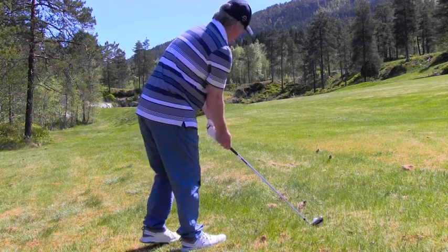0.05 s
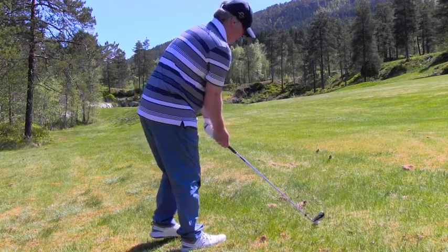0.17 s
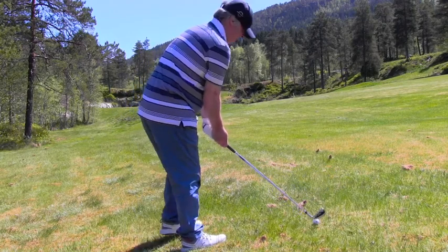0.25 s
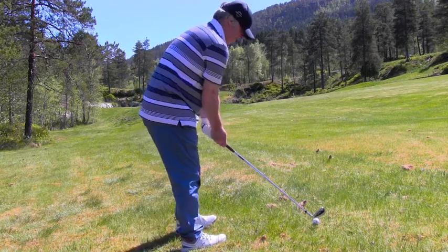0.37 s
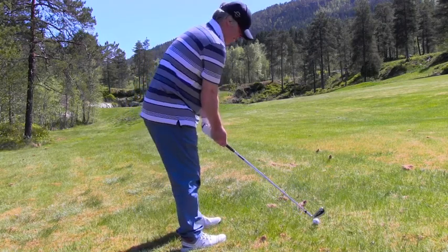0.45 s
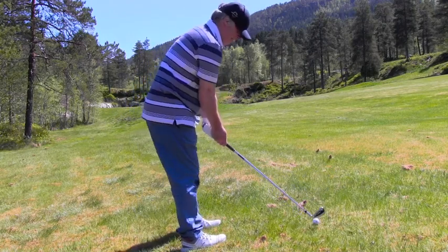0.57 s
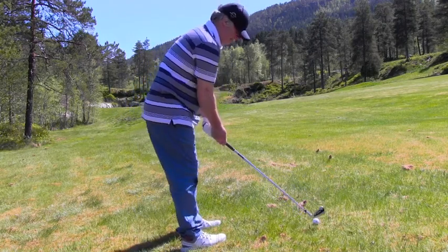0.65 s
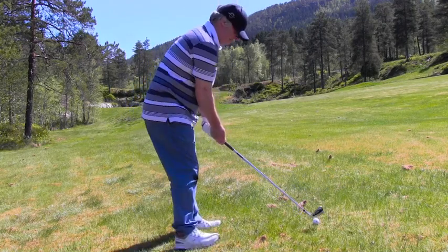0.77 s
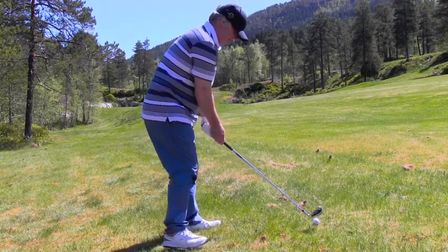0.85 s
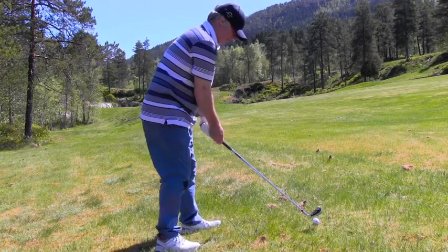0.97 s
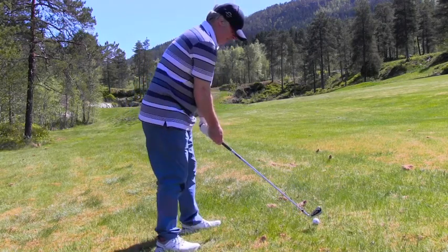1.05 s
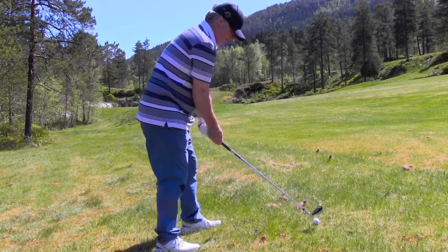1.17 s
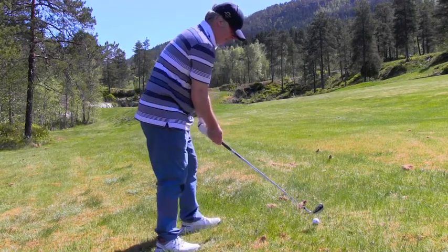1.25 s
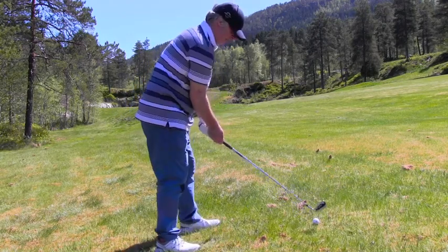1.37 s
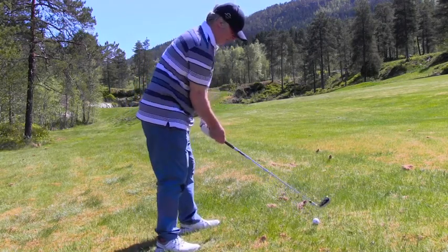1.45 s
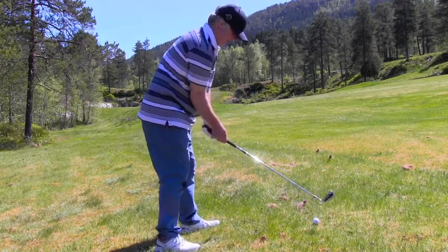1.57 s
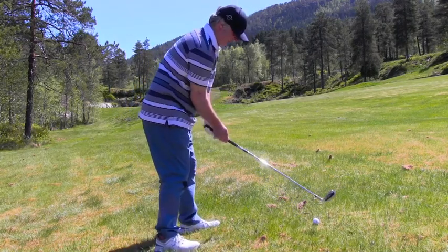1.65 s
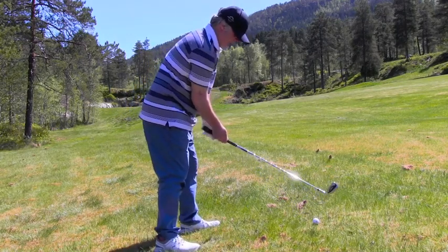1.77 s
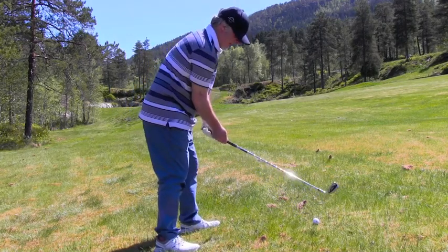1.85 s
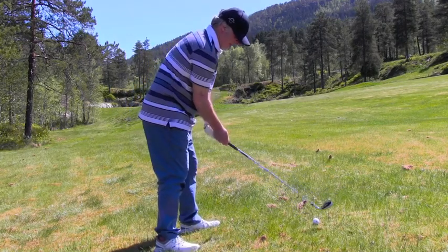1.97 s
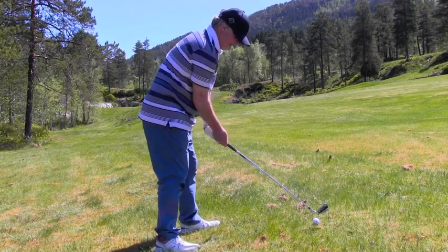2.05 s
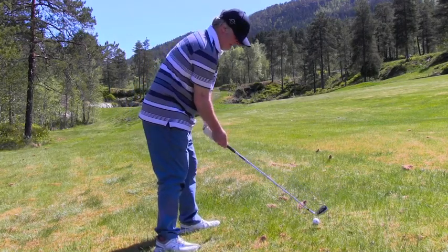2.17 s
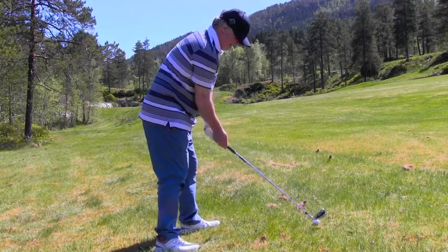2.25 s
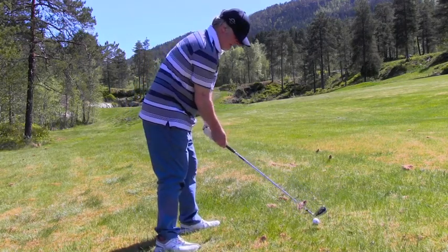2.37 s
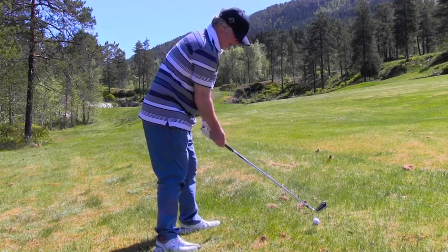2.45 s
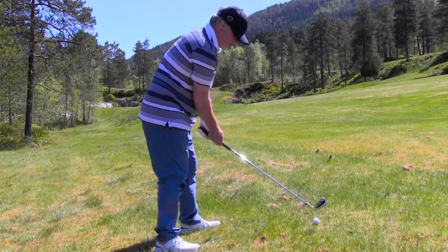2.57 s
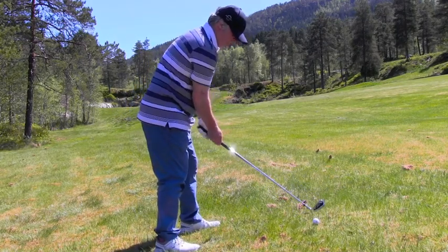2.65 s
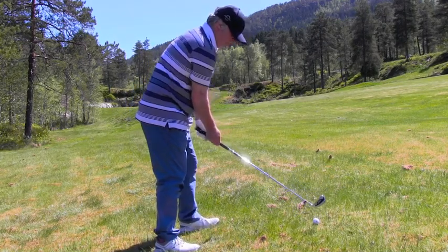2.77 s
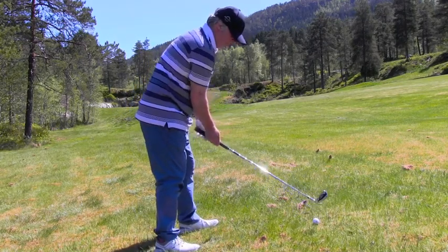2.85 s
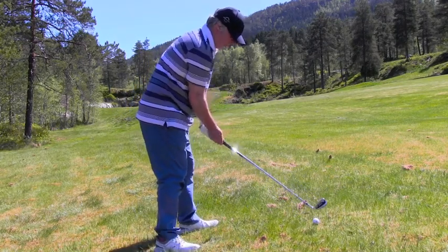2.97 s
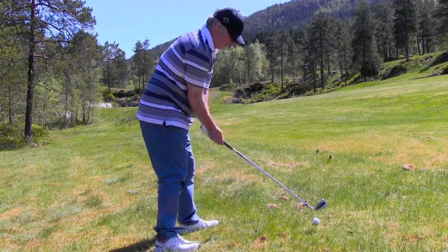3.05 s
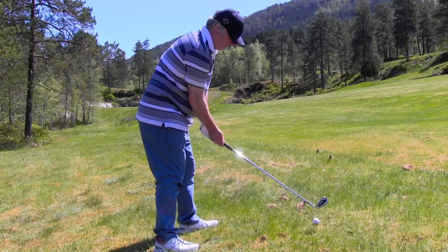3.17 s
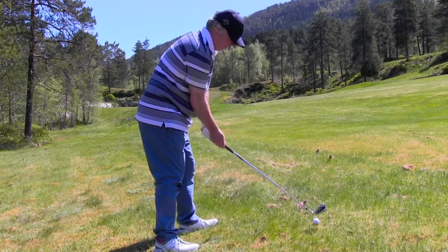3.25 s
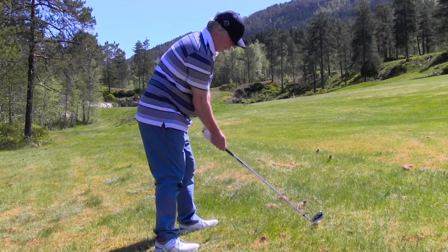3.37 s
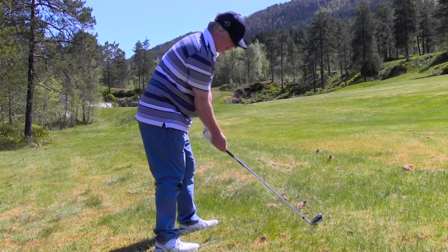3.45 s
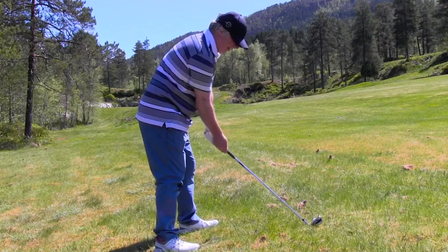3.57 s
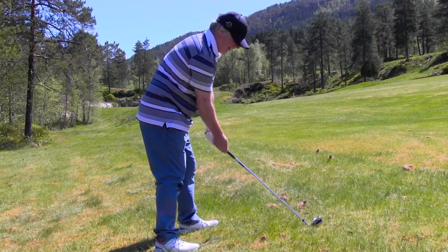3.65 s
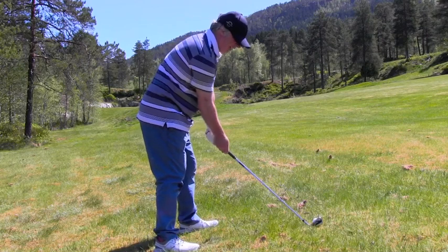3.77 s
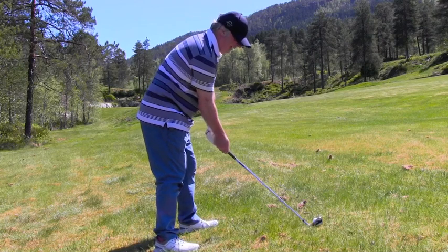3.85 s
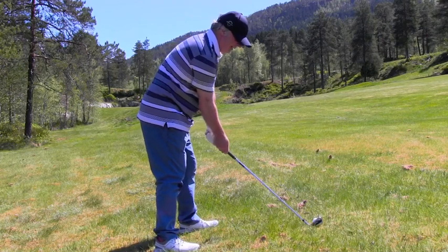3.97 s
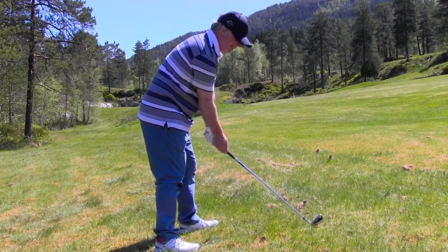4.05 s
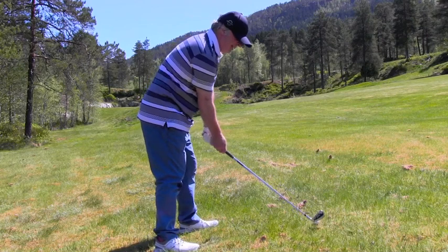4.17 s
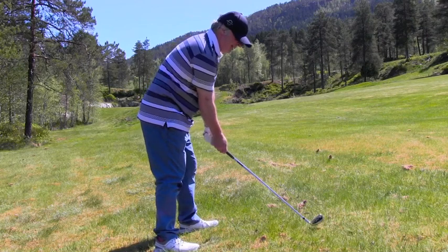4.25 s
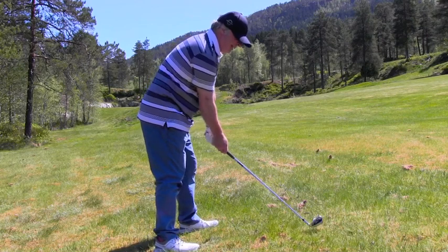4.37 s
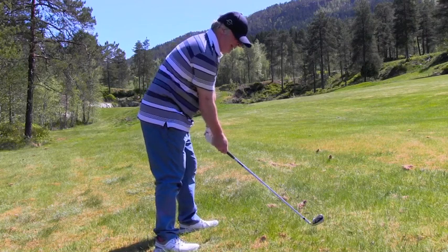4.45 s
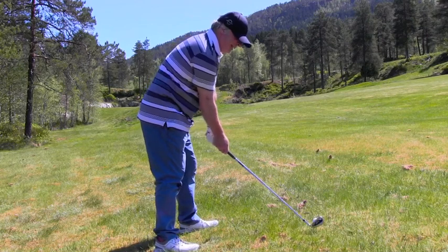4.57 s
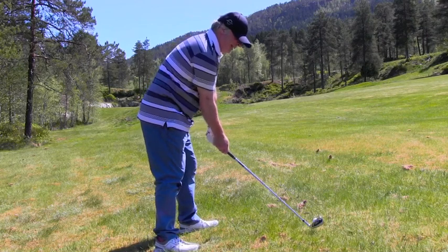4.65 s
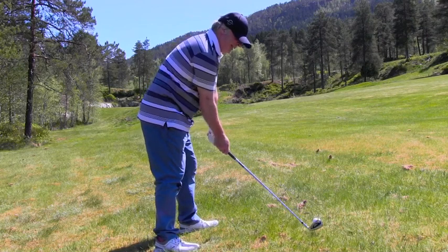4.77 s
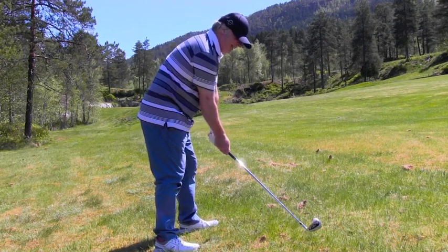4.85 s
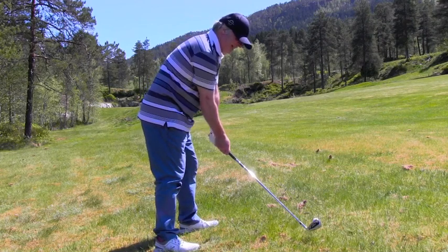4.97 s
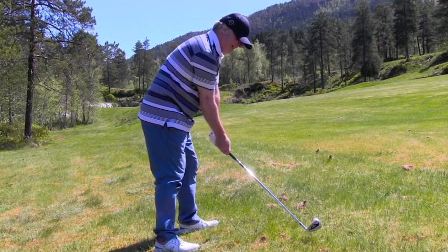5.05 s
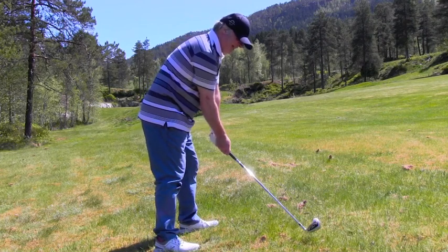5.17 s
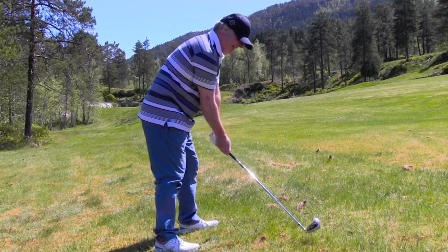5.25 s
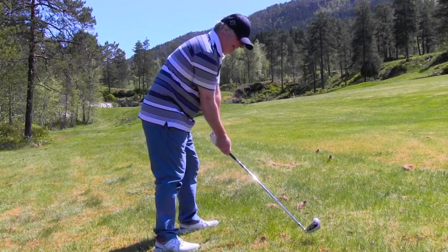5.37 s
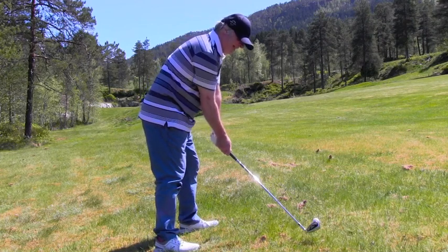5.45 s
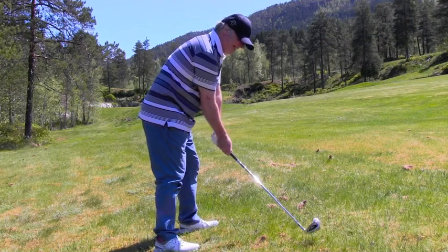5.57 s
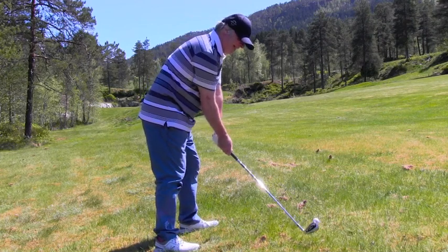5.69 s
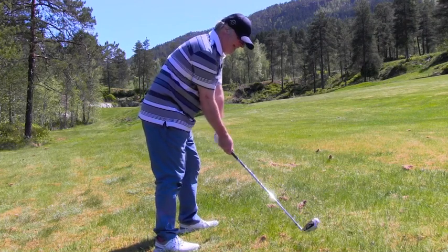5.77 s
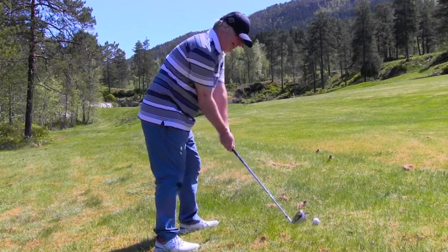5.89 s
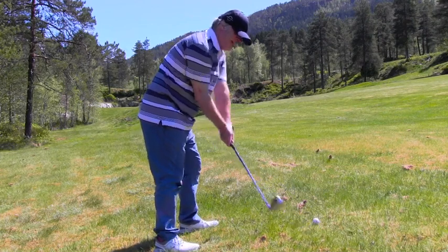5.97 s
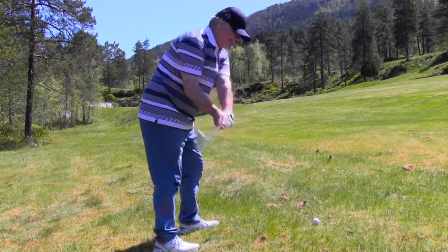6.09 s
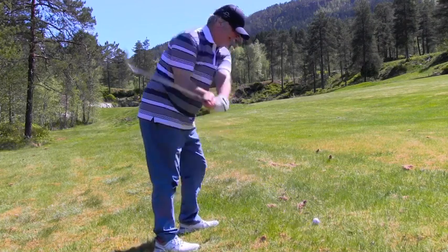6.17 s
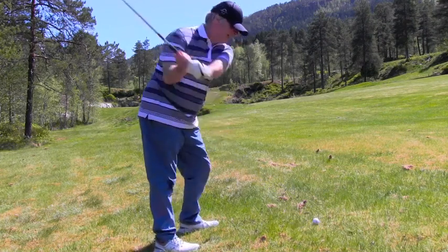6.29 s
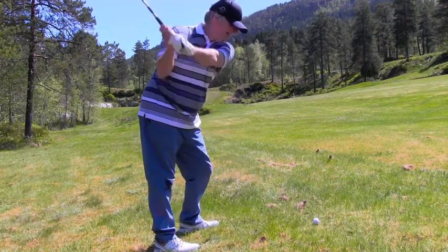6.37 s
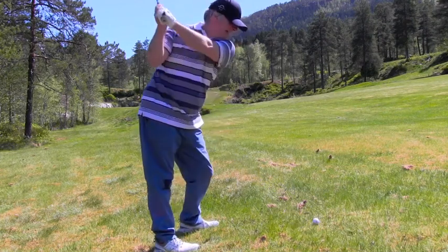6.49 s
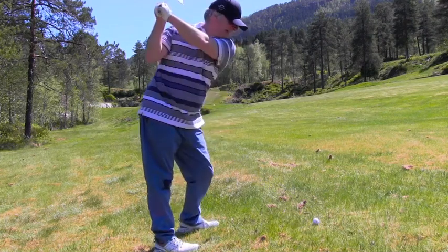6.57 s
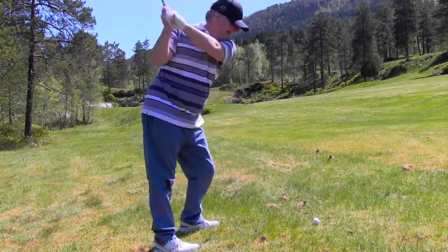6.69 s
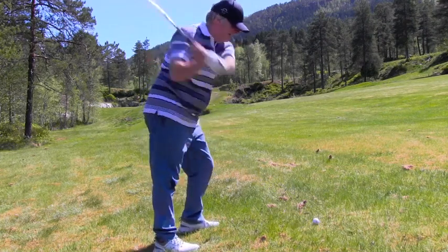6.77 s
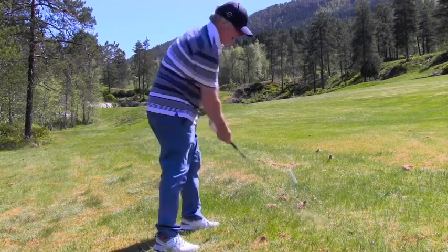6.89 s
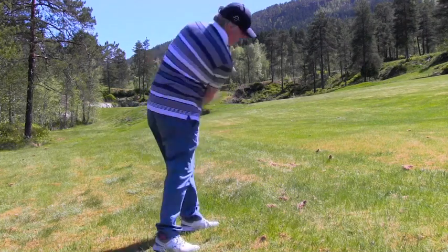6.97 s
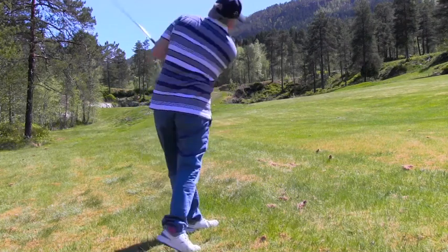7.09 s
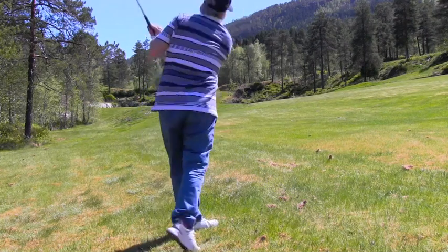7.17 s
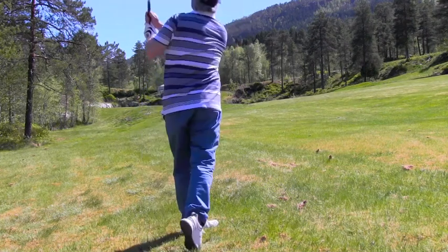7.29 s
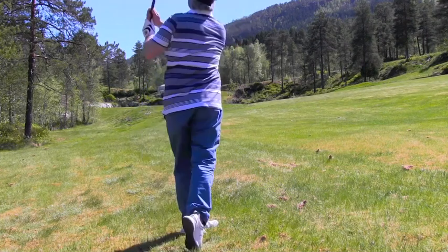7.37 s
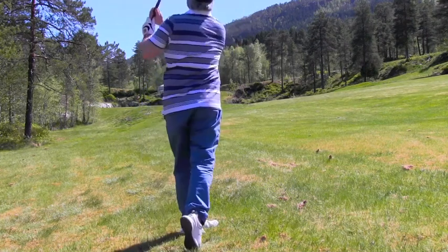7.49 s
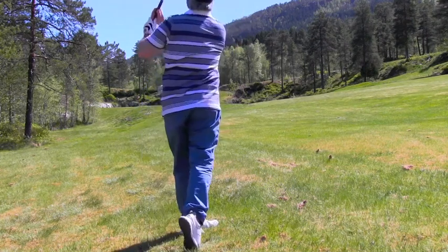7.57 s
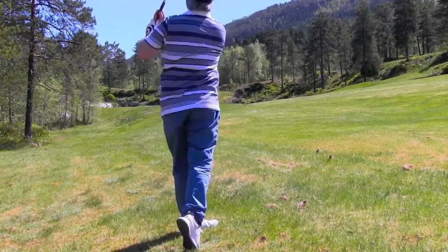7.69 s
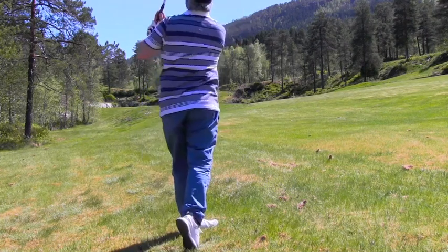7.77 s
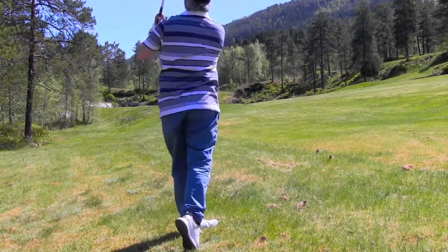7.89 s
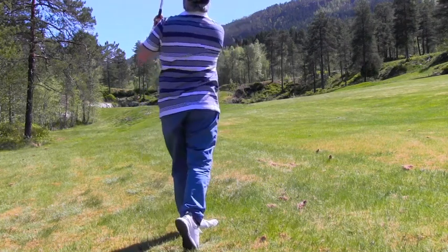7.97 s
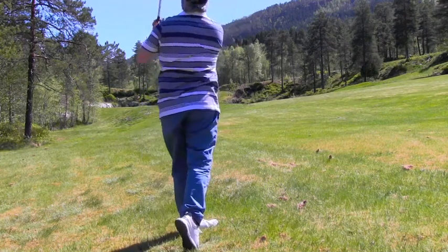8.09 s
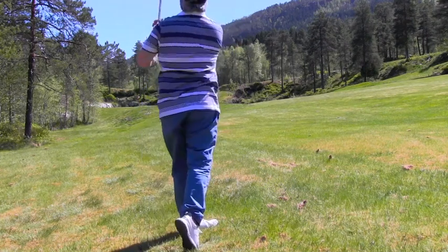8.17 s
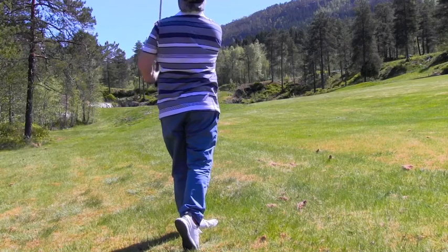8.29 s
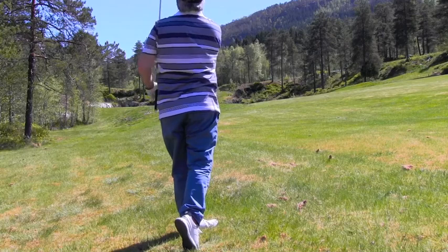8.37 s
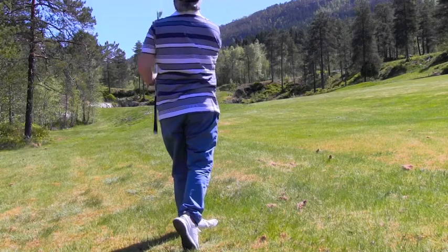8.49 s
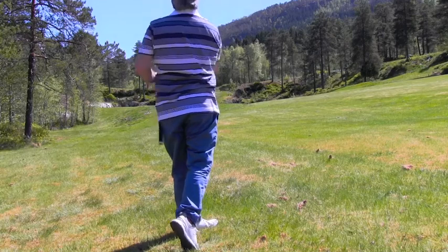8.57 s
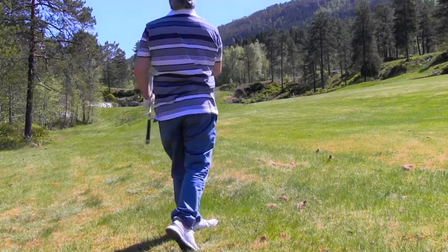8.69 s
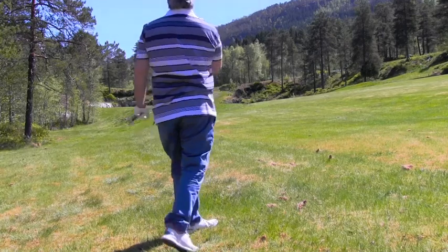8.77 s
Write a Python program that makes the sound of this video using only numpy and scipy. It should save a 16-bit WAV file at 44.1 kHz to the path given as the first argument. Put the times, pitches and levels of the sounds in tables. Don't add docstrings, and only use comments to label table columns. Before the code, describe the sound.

Outdoors on a grassy course, a low distant motor hum pulses slowly beneath soft leaf and road wash, with light wind bumping the microphone. A small warbler on the left sings quick sliding chirps. Twigs crackle, then a nearby golf club swishes and hits the ball with one very sharp, dry click and a turf crunch. Grass patters, cloth rustles, and the quiet air continues.

```python
import sys
import numpy as np
from scipy import signal
from scipy.io import wavfile
from scipy.ndimage import uniform_filter1d

SR = 44100
rng = np.random.default_rng(int(sys.argv[2]) if len(sys.argv) > 2 else 0)


def wrap_up_sound(samples):
    columns = np.atleast_2d(samples).T
    tamed = np.clip(columns, -1, 1)
    steps = np.round(tamed * 32767).astype(np.int16)
    wavfile.write(sys.argv[1], SR, steps)


def attenuation_scalar(level_db):
    decades = np.asarray(level_db, float) / 20
    return 10 ** decades


N = 389378
LEFT_LEAD_S = 8 / SR
STRIKE_S = 7.01296


def evened(x):
    return x / np.sqrt(np.mean(x ** 2) + 1e-20)


def columns(rows, t):
    s, *values = np.transpose(rows)
    return np.array([np.interp(t, s, v) for v in values])


def add(mix, s, sound):
    part = mix[..., round(s * SR):][..., :sound.shape[-1]]
    part += sound[..., :part.shape[-1]]


def humps(rows, t):
    return sum(height * np.exp(-2 * ((t - s) / half) ** 2) for s, height, half in rows)


def panned(pan_db):
    return attenuation_scalar([[pan_db / 2], [-pan_db / 2]])


def resonate(x, hz, width):
    turn = np.exp(2j * np.pi * np.cumsum(hz * np.ones(len(x))) / SR)
    r = np.exp(-np.pi * width / SR)
    return 2 * (turn * signal.lfilter([1 - r], [1, -r], x / turn)).real


def wash(points, same, lead_s, pan_db, patchy_db):
    frames, hz = N // 256 + 5, np.fft.rfftfreq(1024, 1 / SR)
    a, b, c, d, patches = rng.standard_normal((frames, 513, 5)).T
    patches = uniform_filter1d(patches, size=10, axis=0)
    patches = evened(uniform_filter1d(patches, size=12, axis=1))
    f, db = np.transpose(points)
    colour_db = np.interp(np.log(hz + 1), np.log(f), db, -90, -90)[:, None]
    same = np.clip(same, 0, 1)
    left, other = a + 1j * b, c + 1j * d
    late = np.exp(-2j * np.pi * hz * lead_s)[:, None]
    z = np.array([left, same * late * left + np.sqrt(1 - same ** 2) * other])
    z = z * attenuation_scalar(colour_db + patchy_db * patches)
    sound = signal.istft(z, nperseg=1024, noverlap=768)[1][:, :N]
    return evened(sound) * panned(pan_db)


def rumble(wind_db):
    # pitch_hz, density_db (per Hz)
    spectrum = [(18, -40), (30, -20), (40, -8.5), (55, -6), (90, 5), (160, 4), (260, -18), (400, -38)]
    return attenuation_scalar(13.0 - 64.5 + 0.32 * wind_db) * wash(spectrum, 0.77, 0, 0, patchy_db=2.0)


def road(wind_db):
    # pitch_hz, density_db (per Hz)
    spectrum = [(150, -19), (290, -4.5), (410, -2.5), (650, -0.5), (1040, -4.5), (1500, -9), (2000, -32),
                (3500, -46)]
    return attenuation_scalar(1.5 - 45.5 + 0.23 * wind_db) * wash(spectrum, 0.85, LEFT_LEAD_S, pan_db=3.5, patchy_db=0.5)


def trees(wind_db):
    # pitch_hz, density_db (per Hz)
    spectrum = [(700, -2), (1300, 4.5), (1700, 5), (2500, -1.5), (3300, -7.5), (3700, -14), (5000, -18),
                (8000, -52)]
    return attenuation_scalar(3.5 - 54.5 + wind_db) * wash(spectrum, 0.2, 0.43 * LEFT_LEAD_S, pan_db=10.5, patchy_db=1.5)


def whines():
    # pitch_hz, width_hz, level_db
    bands = [(2540, 150, -10), (2920, 130, -10), (4900, 56, -29)]
    # start_s, level_db
    wide_levels = [(0, -47.5), (1, -57.5), (5, -60), (5.8, -50), (6.6, -49.5), (7.3, -57)]
    # start_s, level_db
    thin_levels = [(0, -66), (.7, -70), (1.2, -73), (1.5, -66), (2.1, -69), (2.3, -75), (5, -74), (6, -71),
                   (7.3, -73), (8.83, -72)]
    t = np.arange(N) / SR
    noise = rng.standard_normal(N)
    wide = sum(attenuation_scalar(db) * evened(resonate(noise, hz, width)) for hz, width, db in bands)
    thin = evened(resonate(noise, 3260, 18))
    return (attenuation_scalar(columns(wide_levels, t)) * wide + attenuation_scalar(columns(thin_levels, t)) * thin) * panned(6.0)


def hiss():
    # pitch_hz, density_db (per Hz)
    spectrum = [(1500, -1), (4000, 0.2), (6300, -3.5), (10000, -9), (16000, -12)]
    return attenuation_scalar(-60) * wash(spectrum, 0.75, 0, 0, patchy_db=0.95)


def air():
    # start_s, level_db
    wind = [(0, 2), (.5, 1.5), (1.15, -0.5), (1.6, -3), (2.5, -3.5), (3.25, -1.5), (3.6, -2.5),
            (4.25, -2.5), (4.6, 0), (5.34, 0.7), (5.55, 4), (6, 2.5), (6.15, 4.5), (7.1, 6), (7.55, 2.5),
            (7.86, 4.5), (8.1, 1.5), (8.83, -2.5)]
    wind_db = columns(wind, np.arange(N) / SR)[0]
    return rumble(wind_db) + road(wind_db) + trees(wind_db) + whines() + hiss()


def motors():
    # start_s, first_hz, second_hz
    shafts = [(0, 33.885, 35.24), (1.5, 34.01, 35.348), (3, 34.018, 35.358), (4.5, 33.85, 35.25),
              (6, 34, 35.358), (7.4, 34.098, 35.365), (8.83, 34.12, 35.605)]
    shaft_of_tone = [0, 1, 0, 0, 1, 0, 0, 1]
    multiple = [6, 6, 0, 2, 2, 3, 4, 4]
    # added pitch_hz (a steady mains buzz, and low tones a little sharp)
    sharp_hz = [0, 0, 100.15, .175, 0, .4, 0, 0]
    in_step_s = [.117, .117, 1.45, .31, .31, 1.45, .117, .117]
    tone_db = [-64.5, -65.5, -67, -48, -57.5, -56.5, -47.5, -47.5]
    follows = [.1, .1, .1, .95, .1, 0.29, 0.17, .1]
    # start_s, level_db
    carry = [(0, 1), (.5, 5.5), (1.2, 4), (2, 1.5), (2.8, -3), (3.6, -5.5), (4.4, 0.7), (5.2, 2),
             (6.8, -0.3), (7.6, -5), (8.4, -1.5)]
    # start_s, depth_db, half_length_s
    nulls_first = [(0.01, -31, 0.46), (2.1, -12, 0.94), (4.3, -8, .5), (6, -20, 0.49), (7.7, -8, 0.25)]
    # start_s, depth_db, half_length_s
    nulls_second = [(8.1, -15, 0.25)]
    t = np.arange(N) / SR
    hz = columns(shafts, t)[shaft_of_tone] * np.c_[multiple] + np.c_[sharp_hz]
    turns = np.cumsum(hz, axis=1) / SR
    turns = np.array([u - np.interp(s, t, u) for u, s in zip(turns, in_step_s)])
    db = np.c_[tone_db] + np.c_[follows] * columns(carry, t)
    db[-2:] += [humps(nulls_first, t), humps(nulls_second, t)]
    hum = np.sqrt(2) * (attenuation_scalar(db) * np.cos(2 * np.pi * turns)).sum(0)
    return np.array([hum, np.roll(hum, shift=round(1.95 * LEFT_LEAD_S * SR))])


def buffets():
    gusts = [
        (0.155, -42, 0.23),
        (.78, -48, .12),
        (1.45, -48, 0.39),
        (1.97, -57, .2),
        (3.15, -62, .25),
        (4.4, -68, .3),
        (6.3, -54, .15),
        (7.45, -58, .2),
        (8.3, -65, 0.38),
    ]
    noise = rng.standard_normal((2, N))
    lumps = np.array([resonate(resonate(resonate(port, 57, 60), 57, 60), 55, 120) for port in noise])
    swell = humps([(s, attenuation_scalar(db), half) for s, db, half in gusts], np.arange(N) / SR)
    return (attenuation_scalar(-72) + swell) * evened(lumps)


def whistles(notes, flutter_db):
    out = np.zeros(N)
    for rows in notes:
        t = np.arange(rows[0][0] - .004, rows[-1][0] + 0.0028, 1 / SR)
        hz, db = uniform_filter1d(columns(rows, t), size=300, axis=1, mode="nearest")
        fade = np.clip(np.minimum(t - t[0], t[-1] - t) / 0.0064, 0, 1)
        add(out, t[0], np.sqrt(2) * attenuation_scalar(db) * fade * np.sin(2 * np.pi * np.cumsum(hz) / SR))
    flutter = evened(uniform_filter1d(rng.standard_normal(N), size=200))
    return out * attenuation_scalar(flutter_db * np.minimum(flutter, .5))


def glides(rows):
    return [[(s, hz, db), (s + length, to_hz, db - 2)] for s, length, hz, to_hz, db in rows]


def shaped(shape, rows):
    return [[(s + u * length, hz * share, db + step) for u, share, step in shape]
            for s, length, hz, db in rows]


def droops():
    # start_s, length_s, from_hz, to_hz, level_db
    rows = [
        (2.875, .022, 6400, 5470, -65),
        (2.99, .032, 6570, 4800, -62),
        (4.961, 0.092, 3280, 2730, -49.5),
    ]
    return [[(s, hz - 0 * to_hz, db - 8), (s + .55 * length, hz + 0.292 * (to_hz - hz), db),
             (s + length, to_hz, db + 1)] for s, length, hz, to_hz, db in rows]


def arches():
    rows = [
        (3.132, .037, 0.027, 5970, -58.5),
        (3.578, 0.046, .02, 4310, -51),
        (3.718, .046, 0.027, 4310, -48.5),
        (3.86, 0.052, 0.024, 4260, -46.5),
    ]
    return [[(s - climb, hz * .935, db - 16), (s, hz, db), (s + drop, hz - 32000 * drop, db - 11)]
            for s, climb, drop, hz, db in rows]


def ladles():
    # start_s, length_s, climb_end_hz, flick_hz (0 for none), level_db
    rows = [
        (4.347, .069, 2950, 5400, -50),
        (4.533, .078, 2950, 5600, -48.5),
        (4.735, .12, 3240, 0, -47.5),
    ]
    notes = []
    for s, length, hz, flick_hz, db in rows:
        end = s + length
        note = [(s - 0.0056, 3590, db - 7), (s, 3890, db), (s + .018, 2450, db - 4.5),
                (s + .04, 2340, db - 8), (end, hz, db - 2)]
        if flick_hz > hz:
            note += [(end + .011, flick_hz, db - 9), (end + 0.0246, 5030, db - 4), (end + 0.036, 4900, db - 5)]
        notes.append(note)
    return notes


def song():
    # start_s, length_s, from_hz, to_hz, level_db
    strokes = [(1.82, .04, 4900, 4100, -66), (1.99, .06, 4700, 4480, -67),
               (4.217, 0.025, 2000, 2650, -53.5), (4.469, 0.023, 2760, 2250, -50),
               (4.589, 0.016, 4250, 3450, -58), (4.778, .022, 4950, 4750, -65),
               (5.06, .044, 2540, 2380, -51), (5.236, .02, 2760, 3150, -49),
               (5.257, .008, 3110, 2350, -54.5), (5.268, .05, 2240, 2070, -52)]
    # length_share, pitch_share, level_db
    hook = [(0, 1.01, -7), (.29, .83, -10), (.5, .99, -0.6), (.79, 1.055, -1), (1, 1.36, -10)]
    # start_s, length_s, pitch_hz, level_db
    hooks = [
        (3.22, .085, 4340, -54.5),
        (3.375, .08, 4270, -53.5),
    ]
    # length_share, pitch_share, level_db
    scoop = [(0, 1.05, 0), (.32, 1, -5), (.86, 1.24, -3), (1, 1.42, -5)]
    # start_s, length_s, pitch_hz, level_db
    scoops = [
        (3.965, .11, 3250, -50),
    ]
    # length_share, pitch_share, level_db
    bow = [(0, 0.94, -2), (.45, 0.99, 0.5), (.71, .956, -3), (1, .817, -7)]
    # start_s, length_s, pitch_hz, level_db
    bows = [
        (4.148, .137, 3670, -52),
    ]
    # length_share, pitch_share, level_db
    chip = [(0, .85, -8), (.4, 0.99, 1.5), (1, .84, -9)]
    # start_s, length_s, pitch_hz, level_db
    chips = [
        (4.088, 0.024, 2960, -51),
        (4.436, .014, 3750, -50),
        (4.453, .014, 3300, -41.5),
        (5.122, .03, 2780, -50),
    ]
    notes = glides(strokes) + shaped(hook, hooks) + shaped(scoop, scoops) + shaped(bow, bows)
    return notes + shaped(chip, chips) + droops() + arches() + ladles()


def warbler():
    # start_s, length_s, from_hz, to_hz, level_db
    splinters = [(2.74, .03, 4610, 3870, -68.5), (2.746, .035, 6410, 5800, -74.5),
                 (2.861, .29, 9710, 9600, -78), (2.921, .03, 5040, 4080, -71.5),
                 (3.796, 0.013, 3810, 3100, -61.5), (3.946, .015, 2410, 3200, -59.5),
                 (4.314, .01, 2810, 3000, -55.5), (4.322, .022, 2180, 2190, -52.5),
                 (4.456, .008, 5010, 4500, -59.5), (4.537, .015, 4100, 3300, -53),
                 (4.596, 0.016, 3740, 3100, -54), (4.631, .03, 2810, 2950, -54),
                 (4.758, .018, 3710, 4850, -60), (4.6, .01, 2600, 2300, -52), (5.04, .012, 2300, 2500, -54),
                 (5.215, .015, 2200, 2800, -56), (4.935, .025, 3330, 3280, -63),
                 (4.514, .006, 5200, 6200, -64), (4.47, .045, 4900, 4950, -70),
                 (3.198, .02, 5000, 4450, -66), (3.885, .01, 3500, 3300, -60),
                 (3.742, .01, 3550, 3400, -60), (4.866, .015, 2700, 2600, -57.5),
                 (4.881, .03, 3260, 3300, -61.5),
                 (.031, 0.052, 4910, 4700, -69), (.661, .1, 4910, 4900, -71), (.781, .06, 4910, 4100, -70.5),
              (1.2, .05, 3850, 4150, -68), (.09, .04, 4200, 4050, -67), (.901, .07, 3010, 2400, -62.5),
              (1.751, .06, 4910, 5000, -70.5), (5.396, .015, 2610, 3000, -56),
              (5.421, 0.039, 2170, 2020, -52), (5.801, .08, 2910, 3340, -62),
              (5.959, .035, 3260, 3650, -56.5), (5.962, .022, 5010, 4500, -63),
              (5.994, .02, 3340, 2600, -56.5), (5.998, 0.014, 4260, 4100, -59),
              (6.076, .015, 3710, 3000, -56.5), (6.121, .02, 2920, 3460, -53),
              (6.171, .012, 3120, 2900, -51.5), (6.219, .017, 3510, 2800, -50),
              (6.339, .017, 4280, 3270, -52), (6.476, .03, 4010, 2770, -57), (6.661, .02, 2810, 3700, -52)]
    out = whistles(song(), 2.4) + attenuation_scalar(-1.5) * whistles(glides(splinters), 4.2)
    t = np.arange(SR // 4) / SR
    trunks = rng.standard_normal(len(t)) * attenuation_scalar(-60 * t / .5) * (t > .012)
    out = out + attenuation_scalar(-10.5) * signal.oaconvolve(out, trunks / np.linalg.norm(trunks))[:N]
    return np.array([attenuation_scalar(7.5) * out, attenuation_scalar(-2.5) * np.roll(out, round(LEFT_LEAD_S * SR))])


def crackle(size, hz, width, uneven_db):
    grain_db = uneven_db * rng.exponential(1, size).clip(0, 3)
    a, b = rng.standard_normal((2, size)) * attenuation_scalar(grain_db)
    ports = (a, 0.6 * a + 0.9 * b)
    return evened(np.array([resonate(resonate(resonate(g, hz, width), hz, width), hz, 2 * width)
                            for g in ports]))


def spray():
    rows = [
        (7.009, -41, 200, 300, 5300),
        (7.062, -42, 502, 330, 9500),
        (7.2, -53, 40, 65, 9400),
        (7.3, -57, 50, 90, 14000),
        (7.042, -51, 900, 500, 8000),
        (6.33, -58.5, 40, 40, 5500),
        (8.5, -63, 8, 8, 7000),
        (.5, -61, 10, 12, 6000),
    ]
    out, t = np.zeros((2, N)), np.arange(-SR // 4, SR // 2) / SR
    for s, db, rise, fall, width in rows:
        shape = attenuation_scalar(db - np.maximum(-rise * t, fall * t))
        add(out, s + t[0], shape * crackle(len(t), 3700, width, uneven_db=5.0))
    return out


def puffs(rows, pan_db, rise_share):
    out, t = np.zeros((2, N)), np.arange(-2000, 8000) / SR
    for s, db, hz, width, t60 in rows:
        swell = np.exp(-(t / (rise_share * t60)) ** 2)
        shape = np.where(t < 0, swell, attenuation_scalar(-60 * t.clip(0) / t60))
        add(out, s + t[0], attenuation_scalar(db) * shape * crackle(len(t), hz, width, uneven_db=3.0))
    return out * panned(pan_db)


def snaps():
    # start_s, level_db, pitch_hz, width_hz, t60_s
    rows = [(2.6, -57, 3000, 1500, .08), (3.22, -56, 5300, 2000, .02), (3.431, -53, 6000, 2000, .015),
            (5.228, -57, 3500, 3000, .04), (5.532, -44, 2100, 1400, 0.11), (5.54, -46, 1520, 300, .12),
            (5.68, -49, 2370, 600, 0.73), (5.536, -53, 4100, 2500, .05), (5.53, -50, 2800, 1500, .05),
            (6.328, -54, 4900, 1500, .08), (6.334, -42, 1700, 1500, 0.15), (6.333, -50.5, 3100, 2500, .12),
            (6.36, -41, 1550, 900, .1), (6.37, -50, 3100, 500, .05), (6.347, -57, 5200, 800, .03),
            (6.24, -46, 1500, 700, .05)]
    return puffs(rows, pan_db=10.5, rise_share=0.064)


def swish():
    # start_s, level_db, head_hz, shaft_hz (shedding pitches)
    rows = [
        (6.85, -62, 330, 800),
        (6.93, -64, 400, 900),
        (6.95, -44, 457, 950),
        (6.968, -36.5, 497, 1010),
        (6.99, -38.5, 540, 1350),
        (7.01, -39, 474, 1500),
        (7.028, -35, 400, 1000),
        (7.04, -52, 330, 1100),
        (7.1, -67, 300, 900),
    ]
    t = np.arange(rows[0][0], rows[-1][0], 1 / SR)
    db, head_hz, shaft_hz = columns(rows, t)
    eddies, out = rng.standard_normal((3, len(t))), np.zeros(N)
    groove_hz = 2.3 * shaft_hz
    head = evened(resonate(resonate(eddies[0], head_hz, 230), head_hz, 500))
    shaft = evened(resonate(resonate(eddies[1], shaft_hz, 400), shaft_hz, 900))
    grooves = evened(resonate(resonate(eddies[2], groove_hz, 1500), groove_hz, 2200))
    add(out, t[0], attenuation_scalar(db) * (head + attenuation_scalar(-1.5) * shaft + attenuation_scalar(-6.5) * grooves))
    return out * panned(-1.2)


def ring(modes):
    t = np.arange(SR // 10) / SR
    return sum(np.outer([left, right], attenuation_scalar(-60 * t / t60) * np.sin(2 * np.pi * hz * t))
               for hz, left, right, t60 in modes)


def strike():
    # pitch_hz, left, right (signed sizes), t60_s
    iron = [(200, -0.26, -0.22, 0.02), (400, -0.63, -1.1, 0.0041), (800, -0.11, -0.1, 0.038),
            (1015, 1.26, 1.54, 0.0059), (1500, 0.076, 0.087, 0.029), (2060, 0.48, 0.62, 0.0052),
            (2546, -0.27, -0.16, 0.017), (2920, 0.13, 0.023, 0.014), (3240, -0.04, -0.081, 0.03),
            (3760, 0.14, 0.12, 0.015), (4480, 0.07, 0.145, 0.011), (4950, -0.08, -0.12, 0.012),
            (6190, 0.05, 0.06, 0.016), (7760, -0.035, -0.06, 0.011)]
    # pitch_hz, left, right (signed sizes), t60_s
    rebound = [(400, 0.055, 0.075, 0.081), (710, 0.051, 0.12, 0.042), (1300, 0.47, 0.51, 0.012),
               (1650, -0.12, -0.11, 0.014), (2300, -0.078, 0.33, 0.009)]
    out = np.zeros((2, N))
    add(out, STRIKE_S, ring(iron))
    add(out, STRIKE_S + .0014, ring(rebound))
    return out


def cracks():
    # start_s, level_db (peak), pitch_hz (centre), width_hz, t60_s
    rows = [
        (7.0135, -30, 12000, 6500, 0.015),
        (7.0145, -33, 3700, 1500, 0.011),
        (7.0165, -30, 5500, 4000, 0.02),
        (7.0247, -26, 12500, 7000, 0.011),
        (7.0247, -31, 6000, 4000, .016),
        (7.016, -42, 14000, 6000, .06),
        (7.029, -41, 9000, 9000, .015),
        (7.0255, -39, 2900, 2900, .035),
    ]
    return puffs(rows, pan_db=-3, rise_share=0.03)


def rustles():
    # start_s, level_db, pitch_hz, width_hz, t60_s
    rows = [
        (7.2, -45, 2040, 1500, .15),
        (7.22, -58, 6600, 5000, .04),
        (7.17, -54, 5000, 5000, .02),
        (7.28, -48, 3500, 4000, .02),
        (8.36, -49.5, 6400, 6000, .03),
        (8.4, -60, 5400, 5000, .15),
    ]
    return puffs(rows, pan_db=0, rise_share=.1)


def scene():
    club = strike() + swish() + spray() + cracks() + rustles()
    club = signal.lfilter(*signal.butter(4, 15300, fs=SR), club)
    return air() + motors() + buffets() + warbler() + snaps() + club


def top_cut(x):
    return signal.sosfilt(signal.butter(12, 16460, fs=SR, output="sos"), x)


def record(dry):
    after = np.arange(N) / SR - STRIKE_S - .012
    dip_db = -5 * (after > 0) * np.exp(-after.clip(0) / 0.025)
    x = dry * attenuation_scalar(uniform_filter1d(dip_db, size=300))
    x = x / (1 + abs(x / 1.2) ** 8) ** (1 / 8)
    band = signal.firwin(301, 15650, window=("kaiser", 7), fs=SR)
    mix = signal.oaconvolve(x, band[None], "same", axes=1)
    return top_cut(mix)


dry = scene()
out = record(dry)
wrap_up_sound(out)
```